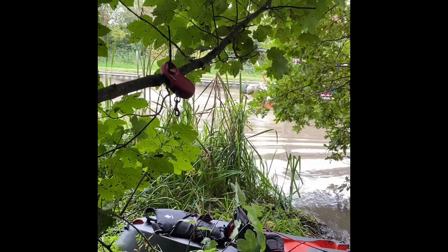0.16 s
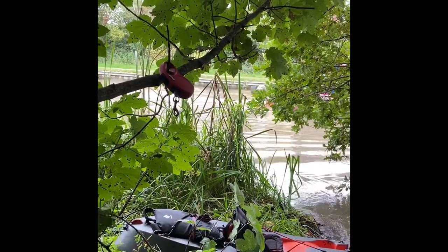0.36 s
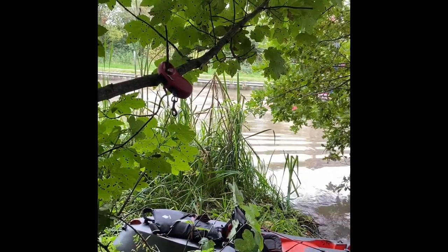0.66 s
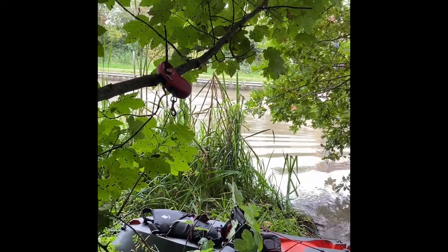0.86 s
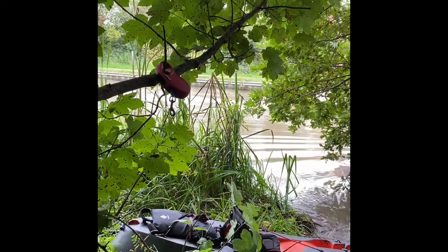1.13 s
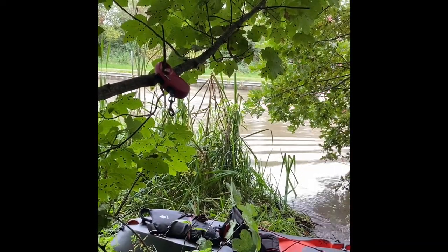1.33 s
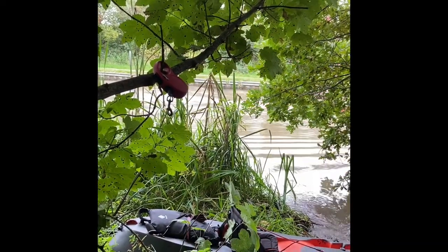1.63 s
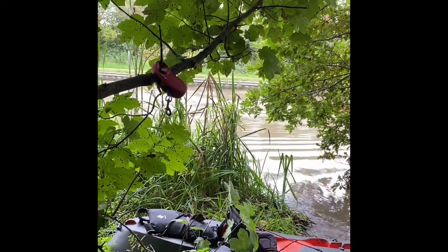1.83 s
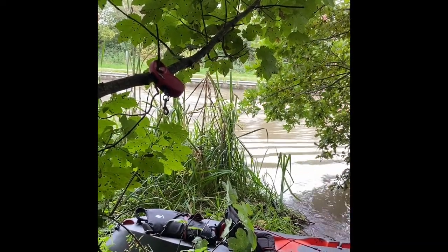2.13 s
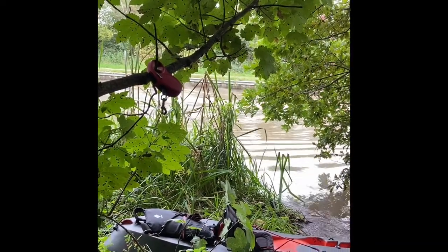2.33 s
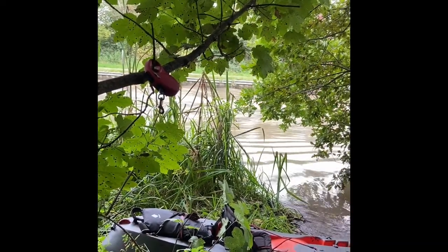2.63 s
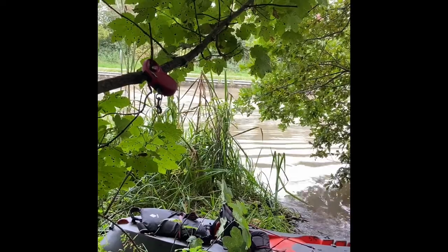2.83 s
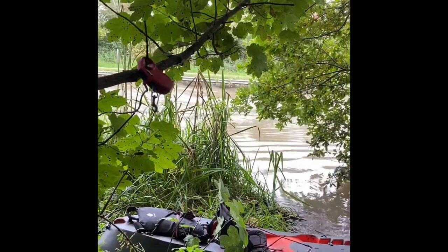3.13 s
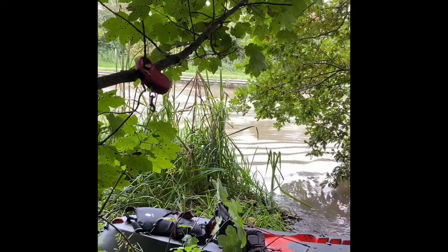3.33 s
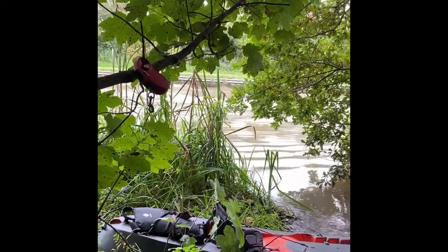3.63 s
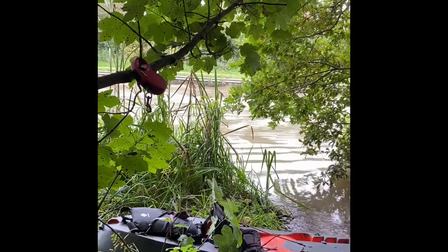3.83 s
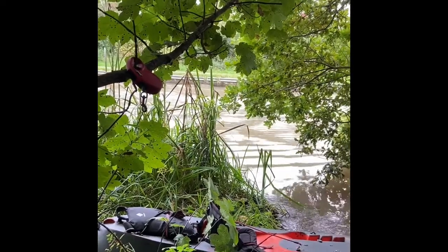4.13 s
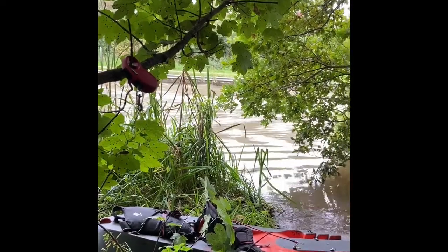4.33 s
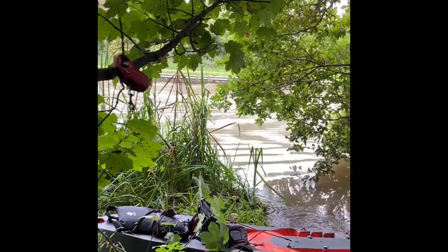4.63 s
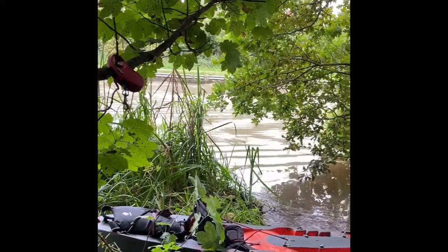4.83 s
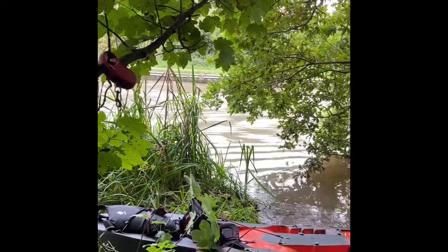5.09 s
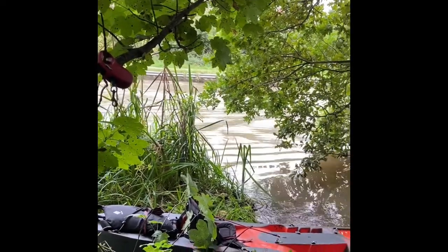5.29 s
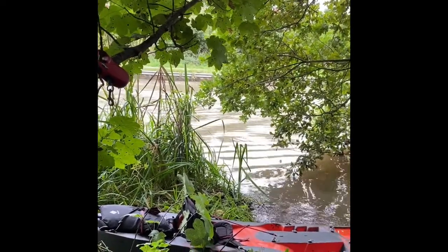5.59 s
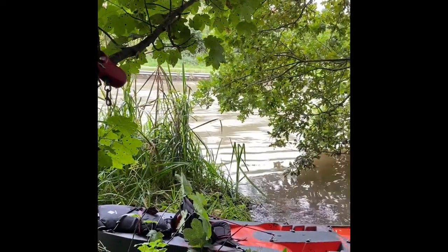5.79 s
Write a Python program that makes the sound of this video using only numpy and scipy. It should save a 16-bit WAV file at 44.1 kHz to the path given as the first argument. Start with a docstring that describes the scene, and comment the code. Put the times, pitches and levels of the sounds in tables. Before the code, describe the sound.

Close outdoor engine chug, nearly seven uneven double thuds per second, bassy and clattery, gradually losing its bright edge as the boat moves by.

```python
"""A narrowboat's slow twin-cylinder diesel thumps by on a canal, heard from the bank under trees.
Each engine cycle has two firings close together: both boom in the pipe and puff out gas, the second harder.
Bright bands in each knock mostly climb as the echoes' delay shrinks; loose parts tick, the hull hums, a bird
chirps. The boat is pulses ringing resonances, short tones and bursts of shaped noise; an inverted echo with a
shrinking delay colours it, banks and trees scatter it as a noise tail, and a steady noise wash lies behind."""
import sys
import numpy as np
from scipy import signal
from scipy.fft import rfft, irfft, next_fast_len
from scipy.io import wavfile
from scipy.ndimage import uniform_filter1d, map_coordinates

SR = 44100
rng = np.random.default_rng(int(sys.argv[2]) if len(sys.argv) > 2 else 0)


def output_pcm(signal):
    """Save a mono or channel-first signal as 16-bit PCM at the path in sys.argv[1].

    Samples are clipped to [-1, 1] before scaling.
    """
    pcm = np.clip(np.atleast_2d(signal).T, -1, 1) * 32767
    wavfile.write(sys.argv[1], SR, np.round(pcm).astype(np.int16))


N = 262395

FIRST_S, SECOND_S = 0.00663, .0415  # the two firings, counted from the start of a cycle
CRACK_SPREAD_HZ = 114  # the rings of one crack lie this far either side of its pitch, at most
LEAD = SR // 2  # samples ahead of 0 s, so that the engine is already running
SIZE = next_fast_len(N + 2 * LEAD)
TIME = (np.arange(SIZE) - LEAD) / SR
FREQS = np.maximum(np.arange(SIZE // 2 + 1) * SR / SIZE, 1e-3)
PUFF_TIME = np.arange(4096) / SR


def undb(db):
    """Decibels to gain."""
    return 10 ** (np.asarray(db) / 20)


def level(x, db):
    """Set the average (rms) level."""
    return x * undb(db) / np.sqrt(np.mean(x ** 2))


def colour(x, points):
    """Filter by (f/Hz, level/dB) points joined on a log-frequency axis."""
    hz, db = np.transpose(points)
    size = x.shape[-1]
    freqs = np.maximum(np.arange(size // 2 + 1) * SR / size, 1)
    gain = undb(np.interp(np.log(freqs), np.log(hz), db))
    return irfft(rfft(x) * gain, size)


def resonate(x, modes, order=1):
    """Ring a set of modes; neighbours swing in opposite senses, and a higher order swells before it fades."""
    response = 0
    for k, (hz, width, db) in enumerate(modes):
        detuning = (FREQS / hz - hz / FREQS) * hz / width
        response = response + (-1) ** k * undb(db) / (1 + 1j * detuning) ** order
    return irfft(rfft(x) * response, SIZE)


def delay(x, seconds):
    """Read a sound a fixed or moving time late."""
    return map_coordinates(x, [np.arange(SIZE) - seconds * SR], order=3)


def add(track, s, sound):
    """Mix a sound into a track at time s."""
    start = LEAD + int(s * SR)
    track[start:start + len(sound)] += sound[:SIZE - start]


def pulses(times, db, jitter_s):
    """One slightly mistimed pressure pulse per firing."""
    track = np.zeros(SIZE)
    late = jitter_s * rng.standard_normal(len(times))
    track[LEAD + ((times + late) * SR).astype(int)] = undb(db)
    return track


def cycles():
    """Start times of the engine cycles, found by adding up the almost steady engine speed."""
    # engine speed: [t/s, cycles per second f/Hz]
    speed = [(0, 6.7047), (1.3, 6.7213), (2.7, 6.7222), (4.3, 6.7096), (6, 6.7132)]
    beat_s = .0985  # one cycle starts exactly here
    turns = np.cumsum(np.interp(TIME, *np.transpose(speed))) / SR
    turns = turns - np.interp(beat_s, TIME, turns)
    return np.interp(np.arange(-2, turns[LEAD + N]), turns, TIME)


def firings(s):
    """No two cycles burn alike: dB of first puff, second's body, crack and hiss, and pitch of the crack."""
    # second firings whose crack is set one by one:
    # [t/s, crack level/dB, crack pitch f/Hz, low-range level/dB]
    barks = [(.29, -50, 1450, -1.5), (.44, -48, 1450, 0.5), (.59, -50, 1370, 0.5), (.74, -36, 1374, -2),
             (.89, -34.5, 2500, 1), (1.03, -32.5, 2360, -1), (1.18, -32, 2296, -7), (1.48, -37.5, 1750, 7),
             (1.78, -50, 1700, 4.5), (1.92, -31.5, 2497, 2), (2.08, -39, 1530, 1), (2.22, -42, 1630, 2.5),
             (2.37, -39.5, 1595, -0.5), (2.52, -33.5, 2730, 3.5), (2.67, -29.5, 2475, -3),
             (2.82, -39, 2200, 2), (2.97, -45, 2580, 1.5), (3.11, -40, 1973, 3.5), (3.26, -38.5, 1923, -2),
             (3.56, -52, 2560, 3.5), (3.71, -33, 1820, 2), (3.86, -32, 1980, 0), (4.01, -46, 2000, -1),
             (4.16, -36, 2683, -1), (4.31, -42, 1922, -0.5), (4.46, -35, 1320, -1), (5.05, -41, 1920, -1),
             (5.2, -39, 2410, 5.5)]
    soft, body, crack, hiss = rng.standard_normal((len(s), 4)).T
    body_db = 2.5 * body
    crack_db = -44 - 18 * s + crack  # an ordinary crack falls 18 dB per second
    crack_hz = 2310 + 260 * rng.uniform(-0.98, 1, len(s))
    for at_s, db, hz, low_db in barks:
        k = np.argmin(abs(s + SECOND_S - at_s))
        crack_db[k], crack_hz[k], body_db[k] = db, hz, low_db
    return 0.62 * soft, body_db, crack_db, 0.8 * hiss, crack_hz


def boom(s, boom_db, deep_db):
    """Each cylinder pumps the pipe through its own branch; the deepest modes ring on from cycle to cycle."""
    # exhaust pipe and silencer: [f/Hz, width/Hz, level from first cylinder/dB, level from second/dB]
    pipe_modes = [(45.66, 1.92, -10.5, 3), (56.3, 24, -54, -10.5), (93.6, 13.4, -18, -10.5),
                  (85.16, 11.6, -7.5, -60), (139.4, 7.6, -13, -47), (156.2, 12.9, -18, -17),
                  (163, 24.4, -19, -23.5), (197.1, 6.7, -23.5, -49), (241.7, 15.5, -37.5, -28.5),
                  (322.4, 15.5, -35.5, -37), (375, 70, -46, -41)]
    hz, width, first_db, second_db = np.transpose(pipe_modes)
    pipe = 0
    for offset_s, db in ((FIRST_S, first_db), (SECOND_S, second_db)):
        strength_db = .3 * rng.standard_normal(len(s))
        drive = pulses(s + offset_s, strength_db, jitter_s=0.00015)
        pipe = pipe + resonate(drive, list(zip(hz, width, db)))
    pipe = level(pipe, 0)
    deep = colour(pipe, [(58, 5.0), (78, -13)])
    # above 0 dB the deep bass is added, below 0 dB it is taken away
    return (pipe + (undb(deep_db) - 1) * deep) * undb(boom_db)


def sag(s, at_s, from_hz, to_hz, length_s, db):
    """After the second firing the pipe's note sinks as the gas slows."""
    age = np.arange(int(length_s * SR)) / (length_s * SR)
    turns = np.cumsum(from_hz + (to_hz - from_hz) * age) / SR
    note = np.sin(np.pi * age) * np.sin(2 * np.pi * turns)
    return level(signal.fftconvolve(pulses(s + at_s, 0, jitter_s=.0001), note)[:SIZE], db)


def knock(s, first_db, body_db, outlet_db):
    """Firings swell into a hollow tonk, clack the block and ring the outlet, again as the second puff ebbs."""
    # hollow tonk of the exhaust outlet: [f/Hz, width/Hz, level/dB]
    tonk_modes = [(698.3, 167, 7), (985, 210, -18.5)]
    # longer rings of the steel outlet: [f/Hz, width/Hz, level/dB]
    outlet_modes = [(457, 32, -2), (579, 27, -1), (676, 38, -1.5), (808, 148, -9)]
    # short rings of the engine block, at the same pitches for every firing: [f/Hz, width/Hz, level/dB]
    block_modes = [(1335, 330, 2), (1503, 91, -4), (2155, 270, 1.5), (2410, 176, 4.5), (3112, 120, -1),
                   (3734, 180, -6.5), (5070, 370, -11)]

    def strike(modes, order, *blows):
        """Ring modes with blows of (s into the cycle, dB, mistiming s)."""
        drive = sum(pulses(s + at_s, db, jitter_s) for at_s, db, jitter_s in blows)
        return level(resonate(drive, modes, order), 0)

    tonk = strike(tonk_modes, 2.4, (.0003, first_db, .0002), (.0395, body_db - 7.0, .0003))
    outlet = strike(outlet_modes, 1, (.006, first_db - 8.5, .0002),
                    (.0405, body_db, .0003), (.055, body_db - 4.5, .0005))
    block = strike(block_modes, 2.23, (.0045, first_db - 5, .0004), (.0095, first_db - 5.0, .0006),
                   (.0405, 0, .0005), (.0445, -3, .0008), (.053, -11, .0015))
    return (tonk * undb(-34.5 - 2 * TIME) + outlet * undb(outlet_db)
            + block * undb(-37.5 - 2.4 * TIME))


def rattles(count, likeness, grain_db):
    """Grainy turbulence for a run of firings; each takes after the one before."""
    draws = rng.standard_normal((count, 2, len(PUFF_TIME)))
    for k in range(1, count):
        draws[k] = likeness * draws[k - 1] + np.sqrt(1 - likeness ** 2) * draws[k]
    grain = level(uniform_filter1d(draws[:, 1], size=48), 0)
    return draws[:, 0] * undb(grain_db * grain)


def puff(noise, rise_s, fall_s, tail_db, tail_s, patchy_db):
    """Turbulence swells as the valve opens and dies away; each puff favours other broad resonances."""
    # colour of the gas puffs: [f/Hz, level/dB]
    gas_colour = [(100, 4), (250, 4.5), (380, 0.5), (500, -6.5), (750, 5.5), (1050, 3), (1500, -0.5),
                  (2550, 0.5), (3200, -10.5), (4300, -19), (5200, -17.5), (6000, -30.5), (6600, -28),
                  (7300, -46), (8400, -31.5), (11800, -36.5)]
    swell = np.sin(np.pi / 2 * np.minimum(PUFF_TIME / rise_s, 1)) ** 2
    hz = np.arange(1000, 7000, 210)
    patches = patchy_db * np.clip(rng.standard_normal(len(hz)), -2, 1)
    patches[0] = patches[-2:] = 0  # the body and the hiss stay even
    fall = np.exp(-np.maximum(PUFF_TIME - rise_s, 0) / fall_s)
    burst = fall * colour(noise, np.column_stack([hz, patches]))
    tail = undb(tail_db) * np.exp(-PUFF_TIME / tail_s) * noise
    rush = colour(swell * (burst + tail), gas_colour)
    fade_out = np.minimum((PUFF_TIME[-1] - PUFF_TIME) / 0.043, 1)
    return level(rush * fade_out, 0)


def clack(low_hz, high_hz, rise_s):
    """A firing cracks: three short rings at new pitches each time."""
    age = PUFF_TIME / rise_s
    pitch = low_hz + (high_hz - low_hz) * rng.random(size=(3, 1))
    phase = rng.random(size=(3, 1))
    rings = np.sin(2 * np.pi * (pitch * PUFF_TIME + phase)).sum(axis=0)
    return level(rings * age ** 2 * np.exp(-2 * age), 0)


def bright_bands(s, rise_s, weights_db, detune, scatter_db):
    """Three short ringing tones near the pitches that the bright bands of the knock have at time s."""
    # bright bands in each knock, mostly climbing as the echoes' delay shrinks:
    # [t/s, low f/Hz, level/dB, middle f/Hz, level/dB, high f/Hz, level/dB]
    bands = [(0, 705, -49.5, 1349, -45, 2415, -45), (.8, 711, -34.5, 1392, -46, 2456, -41),
             (1.5, 720, -50, 1604, -45.5, 2317, -41), (2.3, 740, -43.5, 1650, -43, 2457, -40.5),
             (3, 926, -42.5, 1960, -41.5, 2702, -43), (3.7, 1009, -41, 1886, -51, 2716, -43.5),
             (4.1, 1073, -38.5, 1922, -41.5, 2683, -46), (4.8, 1070, -50.5, 1997, -48.5, 2720, -48.5),
             (6, 1080, -60, 2270, -41, 2720, -47)]
    at_s, *columns = np.transpose(bands)
    hz, db = np.reshape([np.interp(s, at_s, c) for c in columns], (-1, 2)).T
    pitch, size = rng.standard_normal((2, len(hz)))
    age = PUFF_TIME / rise_s
    turns = np.outer(hz * (1 + detune * pitch), PUFF_TIME) + rng.random((len(hz), 1))
    tones = level(np.sin(2 * np.pi * turns) * age ** 2 * np.exp(-2 * age), 0)
    return undb(db + weights_db + scatter_db * size) @ tones


def gas(starts, firsts, bodies, cracks, hisses, pitches):
    """A soft puff, then a hard one, each with its own crack and bright bands."""
    track = np.zeros(SIZE)
    softs = rattles(len(starts), likeness=.7, grain_db=1.5)
    hards = rattles(len(starts), likeness=0.58, grain_db=2.5)
    for s, first_db, body_db, crack_db, hiss_db, hz, soft, hard in zip(
            starts, firsts, bodies, cracks, hisses, pitches, softs, hards):
        # first firing
        soft = puff(soft, rise_s=0.0074, fall_s=0.0084, tail_db=5.5, tail_s=0.028, patchy_db=10.0)
        soft = colour(soft, [(700, 0.3), (1400, 0.1), (2600, -4.0), (5000, .5 * hiss_db + 1.5)])
        add(track, s - .0003, undb(-35.5 + first_db) * soft)
        pitch, size = rng.standard_normal(2)
        first_hz = 2283 + 173 * pitch
        tick_db = -47 - 3.7 * s + 3.5 * size
        tick = clack(first_hz - CRACK_SPREAD_HZ, first_hz + CRACK_SPREAD_HZ, rise_s=0.0043)
        add(track, s + 0.003024, undb(tick_db) * tick)
        add(track, s + 0.002236, bright_bands(s, rise_s=0.0043, weights_db=np.array([-6, -.5, 0]),
                                              detune=0.033, scatter_db=2.5))
        # second firing
        hard = puff(hard, rise_s=0.011, fall_s=0.0049, tail_db=-12.5, tail_s=0.031, patchy_db=8)
        hard = colour(hard, [(900, body_db), (2200, -1.0), (5000, hiss_db)])
        add(track, s + .0343, undb(-32) * hard)
        crack = clack(hz - CRACK_SPREAD_HZ, hz + CRACK_SPREAD_HZ, rise_s=0.0042)
        add(track, s + .0388, undb(crack_db) * crack)
        add(track, s + .038, bright_bands(s, rise_s=0.0057, weights_db=np.array([1.5, 2, .5]),
                                          detune=0.031, scatter_db=2))
    return track


def machinery(s, db):
    """Valve gear and hull plates repeat the same low clatter every cycle, now stronger, now weaker."""
    # colour of the clatter through the hull: [f/Hz, level/dB]
    hull_colour = [(60, -3), (120, 15), (240, 4), (350, 2), (490, -3.5), (650, -13.5), (1000, -5),
                   (2500, -9), (5000, -25.5), (9000, -83)]
    size = int(SR * np.mean(np.diff(s)))
    turn = rng.standard_normal(size)  # the clatter of one cycle
    starts = pulses(s, 2.7 * rng.standard_normal(len(s)), jitter_s=0.0007)
    repeated = signal.fftconvolve(starts, turn)[:SIZE]
    return level(colour(repeated, hull_colour), 0) * undb(db)


def clatter(per_s, grain_db, db, fade_db_s):
    """Loose engine parts tick at random moments and ring."""
    # rings of the loose parts: [f/Hz, width/Hz, level/dB]
    part_modes = [(1150, 160, 2), (1600, 160, -1), (2210, 63, 2.5), (2676, 90, 4), (3980, 145, -9),
                  (5320, 500, -15.5)]
    chance, size = rng.random((2, SIZE))
    ticks = (chance < per_s / SR) * undb(grain_db * size)
    return level(resonate(ticks, part_modes), 0) * undb(db - fade_db_s * TIME)


def drone():
    """The hull hums: noise rings its broad low modes, slowly fading."""
    # hum of the hull: [f/Hz, width/Hz, level/dB]
    hum_modes = [(183.7, 54, -1), (227.3, 32, -1.5), (259.3, 41, -2.5)]
    hum = level(resonate(rng.standard_normal(SIZE), hum_modes, order=2), 0)
    return hum * undb(-39 - 3 * TIME)


def ears(x, lag_s, tilt_db, leaves_s, leaves_db):
    """Left hears the boat first, right its middle range louder; nearby leaves widen the treble."""
    hz, share = np.array([[320, 600, 1100, 2200, 4000], [0, 1, .8, .3, 0]])
    left = colour(x, np.column_stack([hz, -share * tilt_db / 2]))
    right = colour(delay(x, lag_s), np.column_stack([hz, share * tilt_db / 2]))
    glance = undb(leaves_db) * colour(delay(x, leaves_s), [(1200, -70), (2800, 4.5), (9000, 5.5)])
    return np.array([left + glance, right - glance])


def banks(x, t60_s, wet_db, spread):
    """Trees and banks scatter a diffuse tail, wider towards the treble."""
    t = np.arange(LEAD) / SR
    fade = undb(-60 * t / t60_s) * np.minimum(t / 0.0024, 1)
    mid, side = rng.standard_normal((2, LEAD)) * fade
    side = spread * colour(side, [(130, -57), (350, -11.0), (1200, 0.5), (2500, 4.5), (9000, 9.5)])
    tails = colour(np.array([mid + side, mid - side]),
                   [(60, -26.5), (200, 5.5), (400, 6.5), (1500, -0.5), (2600, -1.5), (4000, 3.5),
                    (5200, 3.5), (10000, 4.0)])
    tails = tails / np.sqrt(np.sum(mid ** 2))
    return undb(wet_db) * signal.fftconvolve(x[None], tails, axes=1)[:, :SIZE]


def chirp(length_s, sag_hz_s, waver_hz, db):
    """A small bird's thin note, wavering and sinking slightly."""
    track = np.zeros(SIZE)
    age = np.arange(int(length_s * SR)) / SR
    waver = level(uniform_filter1d(rng.standard_normal(LEAD), size=150), 0)[:len(age)]
    hz = 8330 - sag_hz_s * age + waver_hz * waver
    note = np.sin(np.pi * age / length_s) ** 2 * np.sin(2 * np.pi * np.cumsum(hz) / SR)
    add(track, .718, undb(db) * note)
    return track


def wash(db):
    """Even background noise, the same on both sides in the bass and wide in the treble."""
    # steady wash of machinery, water and leaves: [f/Hz, level/dB]
    wash_colour = [(25, -23), (60, 20), (160, 7.5), (300, 5), (500, -7), (900, 1.5), (2400, -7),
                   (3400, -21.5), (5200, -15.5), (7300, -43.5), (8500, -27.5), (11500, -27.5), (13500, -49)]
    mid, side = (colour(rng.standard_normal(SIZE), wash_colour) for _ in range(2))
    side = colour(side, [(100, -54), (400, -0.5), (1500, -12), (4000, 3.5), (10000, 12)])
    return level(np.array([mid + side, mid - side]), db)


def scene():
    """The boat, its glancing reflection, and the surroundings."""
    # the boat going by: [t/s, gas puffs level/dB, second puff's low range level/dB, hiss level/dB,
    # machinery level/dB, delay of the reflection/ms, outlet rings level/dB]
    passing = [(0, 0, -4, 8.5, -34, 1, -36.5), (.7, 0, -0.5, 10.5, -36, 1, -34.5),
               (1.3, 0.5, -5, 10.5, -33.5, 0.95, -47), (2.45, .5, -.5, 8, -36, .89, -47),
               (2.75, 0, -1, 5, -38, .86, -42), (3.2, -0.6, -3, 6, -38.5, 0.85, -48),
               (4.4, -.5, 0, 5, -37, 0.81, -49), (6, -3, -1.5, 7.5, -39.5, 0.54, -64)]
    at_s, *columns = np.transpose(passing)
    gas_db, low_db, treble_db, hull_db, detour_ms, outlet_db = (np.interp(TIME, at_s, c) for c in columns)
    s = cycles()
    first_db, body_db, crack_db, hiss_db, crack_hz = firings(s)
    body_db = body_db + np.interp(s, TIME, low_db)
    hiss_db = hiss_db + np.interp(s, TIME, treble_db)
    boat = (boom(s, boom_db=-20 + 0.11 * TIME, deep_db=1 - .5 * TIME)
            + sag(s, at_s=0.057, from_hz=185, to_hz=112.2, length_s=0.065, db=-39.5)
            + knock(s, first_db, body_db, outlet_db)
            + undb(gas_db) * gas(s, first_db, body_db, crack_db, hiss_db, crack_hz)
            + machinery(s, hull_db)
            + clatter(per_s=120, grain_db=12, db=-43.5, fade_db_s=1.4)
            + drone())
    # a glancing bounce comes back inverted and without bass: its notches climb as the delay shrinks
    bounce = colour(delay(boat, detour_ms / 1000),
                    [(200, -73), (600, -20), (1050, -3.5), (2000, -17), (3000, -41.0), (6000, -37)])
    heard = boat - bounce
    direct = ears(heard, lag_s=.000024, tilt_db=4.5, leaves_s=0.001035, leaves_db=-7.0)
    around = banks(heard, t60_s=0.32, wet_db=-10.5, spread=0.26) + wash(db=-36.5)
    bird = chirp(length_s=0.091, sag_hz_s=600, waver_hz=70, db=-45.0)
    out = direct + around + bird
    return out[:, LEAD:LEAD + N]


def record(dry):
    """The microphone dulls the treble, most around 13 kHz, and cuts off the very top."""
    dull = colour(dry, [(11800, 0), (13000, -14), (15500, -3.0)])
    top_cut = signal.ellip(8, .2, 70, 15800, fs=SR, output="sos")  # low-pass at 15800 Hz
    return signal.sosfilt(top_cut, dull)


dry = scene()
out = record(dry)
output_pcm(out)
```